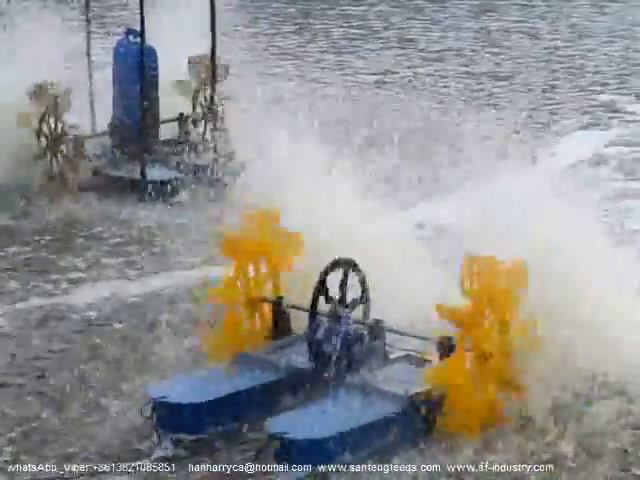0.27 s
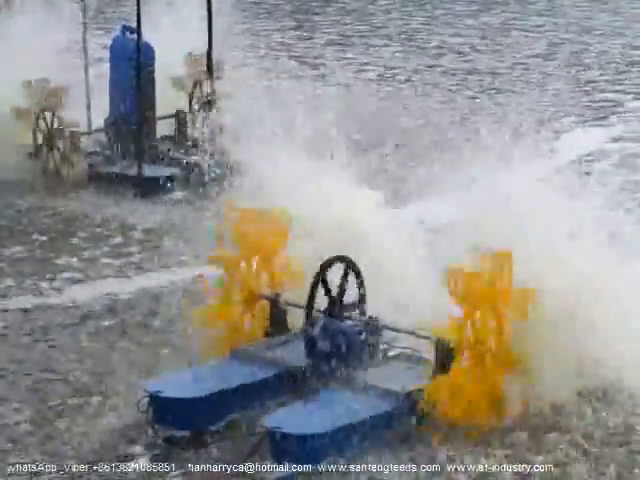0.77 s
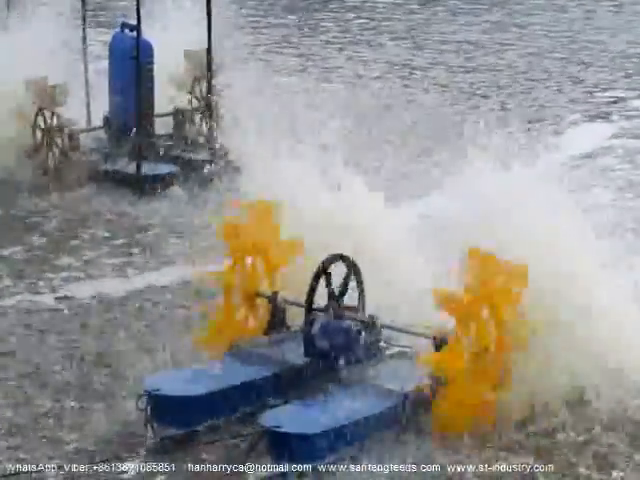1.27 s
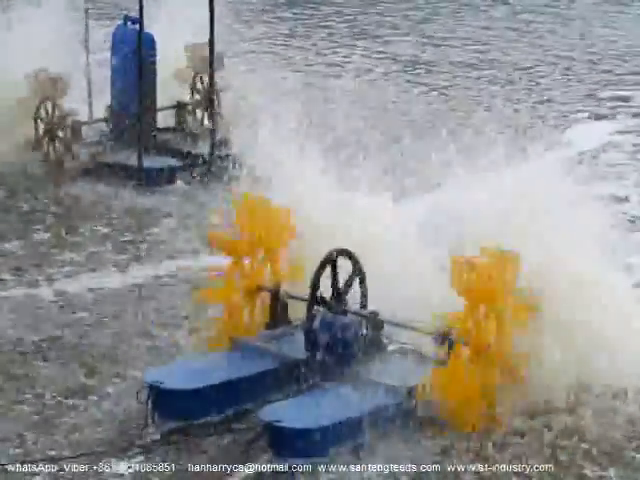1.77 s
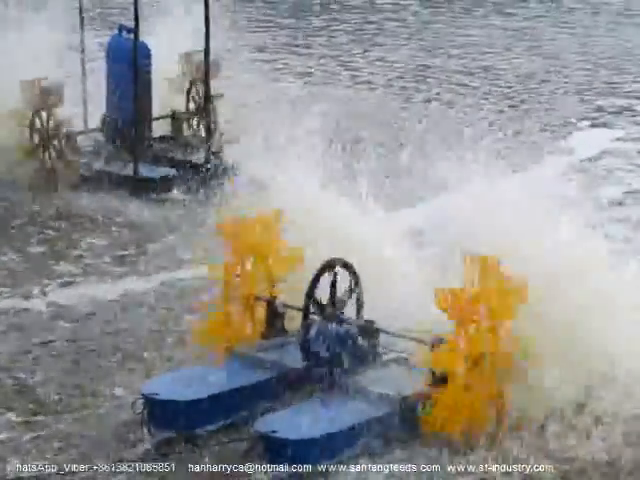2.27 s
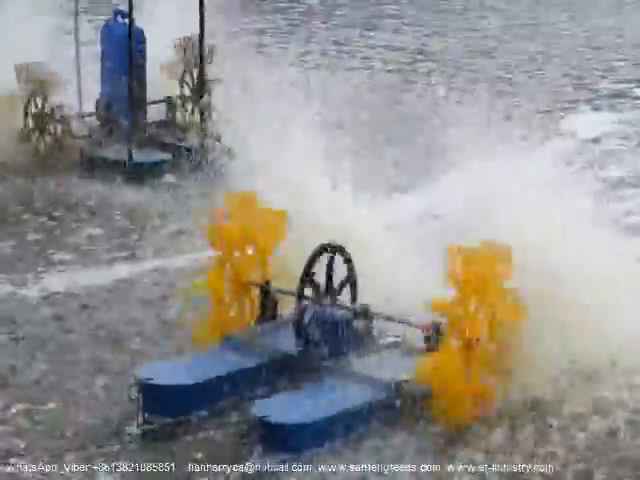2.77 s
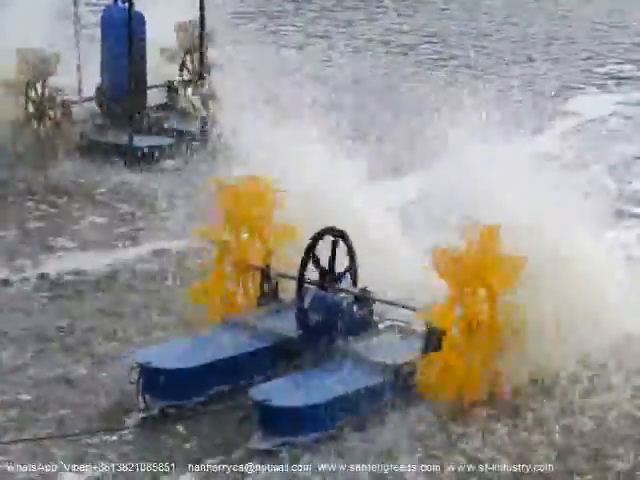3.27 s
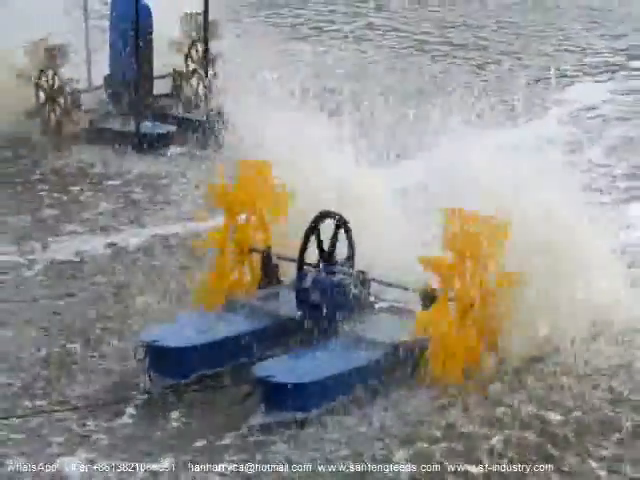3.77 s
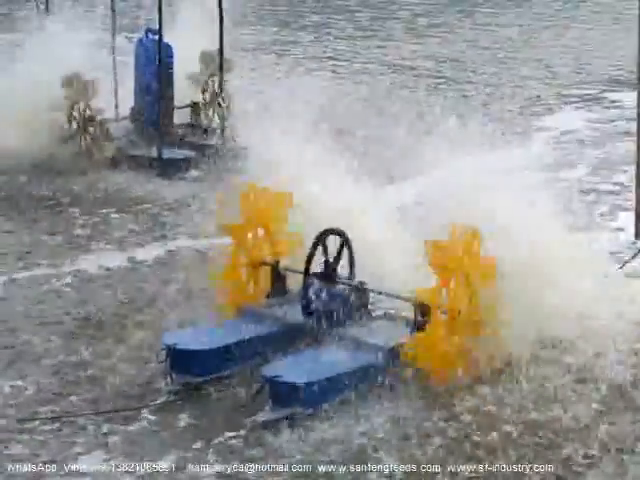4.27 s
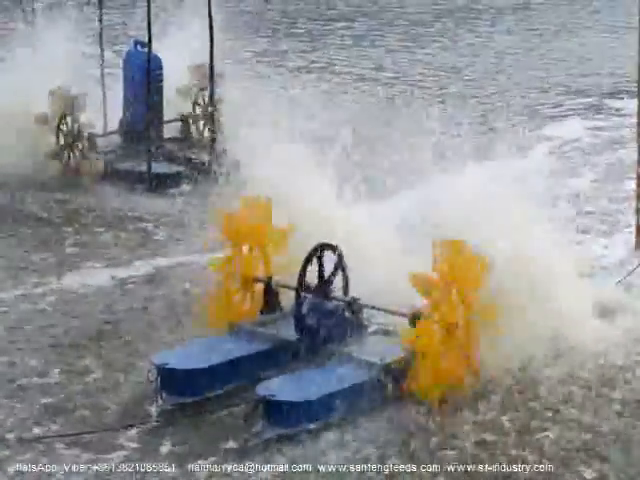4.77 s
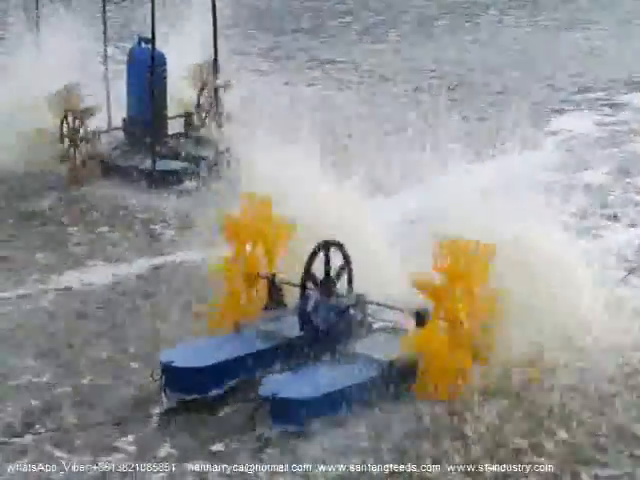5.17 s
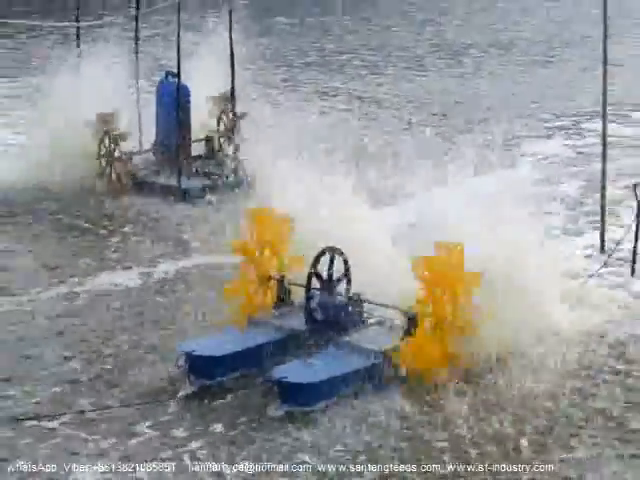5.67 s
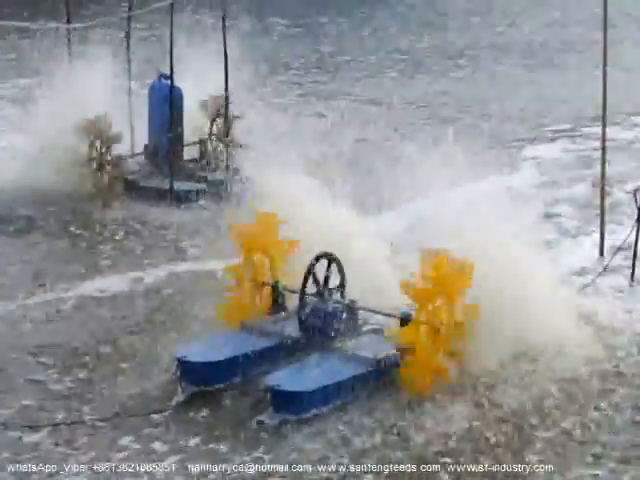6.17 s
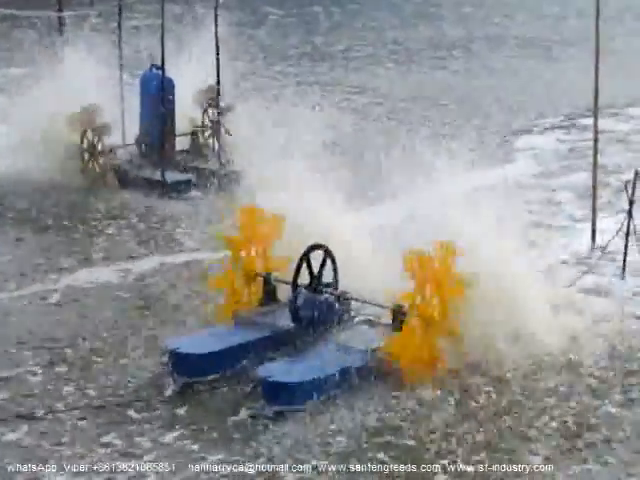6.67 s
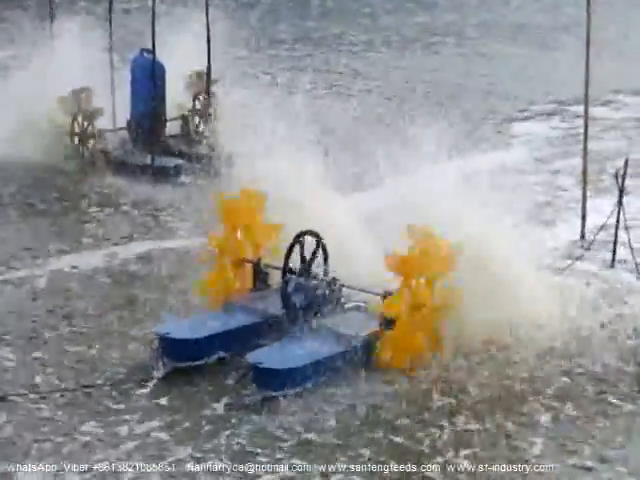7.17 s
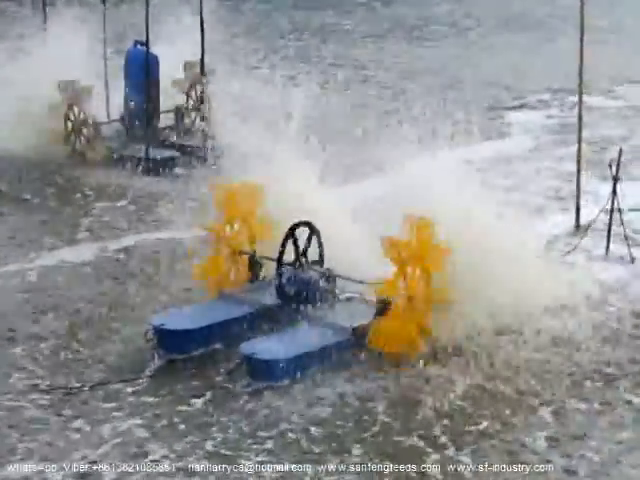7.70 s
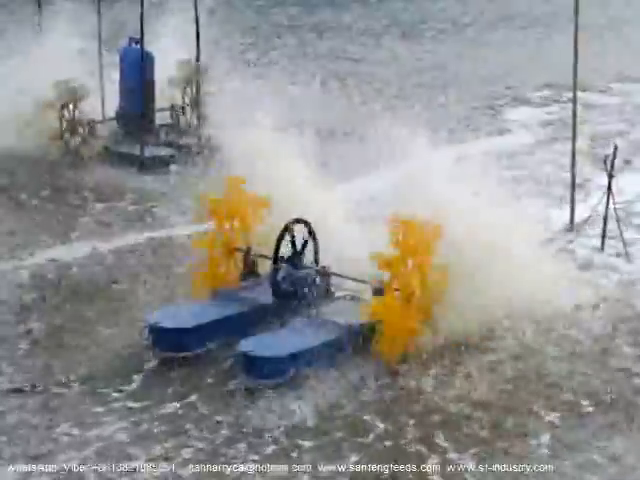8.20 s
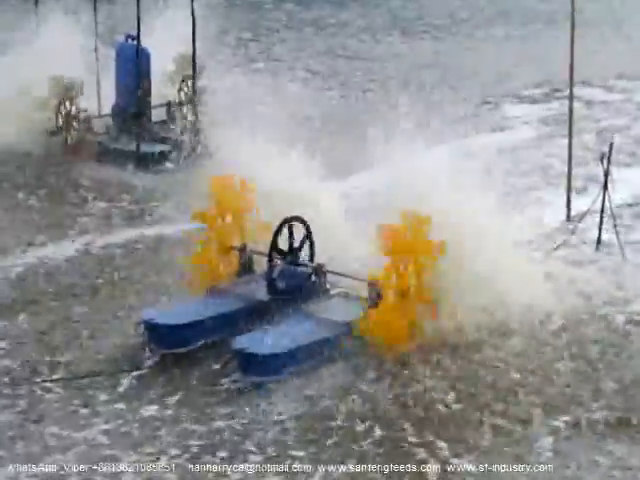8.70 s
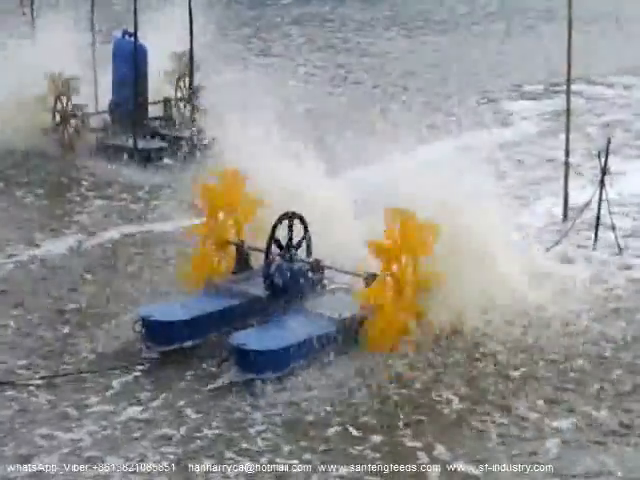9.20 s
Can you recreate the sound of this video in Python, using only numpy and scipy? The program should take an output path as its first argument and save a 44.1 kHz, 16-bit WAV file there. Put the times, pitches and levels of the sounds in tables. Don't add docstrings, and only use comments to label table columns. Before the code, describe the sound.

Outdoors beside a fish pond, paddle wheels throw water in a continuous hissing, bubbling wash with a low, steady motor hum beneath. Wind gusts rumble and thump against a handheld stereo microphone, strongest on the right, often covering the water in the first five seconds. The splashing dips around the middle, then comes forward, fuller and wider, as the wind eases toward the end.

```python
import sys
import numpy as np
from scipy import signal
from scipy.fft import rfft, irfft
from scipy.io import wavfile
from scipy.ndimage import uniform_filter1d

SR = 44100
rng = np.random.default_rng(int(sys.argv[2]) if len(sys.argv) > 2 else 0)


def volts(x):
    e = np.asarray(x, float) / 20
    return 10 ** e


def generate_wav(signal):
    frames = np.transpose(np.atleast_2d(signal))
    scaled = np.clip(frames, -1, 1) * 32767
    pcm = np.round(scaled).astype(np.int16)
    wavfile.write(sys.argv[1], SR, pcm)


N = 416304

# t/s, camera gain as spray level/dB, fullness of the churn/dB
POND_LEVEL = [(0.0, -44, 1), (0.8, -41, 2.5), (1.4, -36.5, 1.5), (2.05, -35.5, 1.5), (2.6, -43, 1.4),
              (3.0, -38.5, 1.5), (3.45, -44.5, 1.2), (3.95, -45, 1.5), (4.6, -52, 1.5), (5.05, -43.5, 3.5),
              (5.55, -50.5, 0), (6.4, -37.5, 2), (7.0, -36.5, 4), (7.4, -37.5, 6), (7.75, -40.5, 5),
              (8.2, -37, 8.5), (8.85, -33.5, 6.5), (9.44, -35, 5.5)]
# f/Hz, density/dB
SPRAY_SPECTRUM = [(40, 1.5), (100, 3.5), (200, 6), (400, 1.5), (570, 3), (850, 2.5), (1300, -4),
                  (2500, -8.5), (3300, -12.5), (4400, -13.5), (8300, -21), (10000, -20), (12600, -15.5),
                  (14200, -20)]
# peak
# t/s, length/s, level change of the wash/dB
PADDLE_THROWS = [(0.555, 0.11, -0.5), (1.35, .15, 0), (2.074, 0.11, 0), (2.925, 0.11, 1),
                 (3.648, 0.24, -0.5), (4.25, 0.13, 2), (5.114, 0.069, 1.5), (5.748, .1, 1.5),
                 (6.3, 0.16, 1), (7.004, 0.093, 0.5), (7.3, .12, 1.5), (7.91, 0.13, 1.5), (8.5, .15, 0.5),
                 (8.996, .1, -0.5)]
# t/s, peak level/dB, f/Hz,
# left minus right/dB
NEAR_TICKS = [(1.517, -15, 620, 18), (1.570, -11, 10200, 17), (2.924, -16, 1700, -1),
              (2.997, -19, 2200, -1), (3.571, -16, 1900, -1), (8.669, -27, 4800, -.5), (.658, -13, 371, 9),
              (4.254, -13, 350, -18), (4.262, -31, 3500, -16), (4.643, -21, 418, 15),
              (5.119, -11, 332, 5.5), (6.33, -13, 563, -4), (7.294, -14, 371, -8.5)]
# multiple of the shaft rate, level over the spray/dB
SHAFT_ORDERS = [(2, 12), (4, 8), (6, 1), (8, -5.5), (12, -11.5)]
# f/Hz, width/Hz, level over the spray/dB
HOUSING = [
    (60.6, 4.7, 3.5),
    (324.6, 67, -2.5),
    (545, 54, -7),
]
# t/s, lowest order level/dB, higher orders level/dB
OVER_WATER = [(0.0, 2, 0.5), (0.45, 0, 0), (0.95, -1, -0.5), (1.25, 0, 2), (1.45, -0.5, -2), (2.3, 0.5, -1),
              (2.6, -0.5, -2), (3.2, 2, 1), (4.0, -2, -2), (4.4, 1, 1.5), (5.5, 0, 0), (6.35, 0, -1.5),
              (7.15, 1, 1), (7.6, 3.5, 0.5), (8.6, -1.5, -1), (9.44, -1, -2.5)]
HUM_STEADINESS = [0.45, 0.14, -0.076]
HUM_USUAL_GAIN = [-40.5, -42.5, -38]
# peak t/s, length/s, buffet level/dB, rush above it/dB
GUSTS_LEFT = [(.06, 0.11, -20, -1), (.32, .12, -20, -13), (.63, 0.32, -18.5, -5.5), (1.2, 0.14, -20, -0.5),
              (1.49, 0.2, -17, -1.5), (1.8, .1, -20, -7), (2.22, 0.46, -22.5, -14), (2.6, 0.11, -28.5, -2),
              (3.0, 0.24, -18, -6), (3.38, 0.32, -24.5, -2.5), (3.8, 0.087, -29, -12),
              (4.33, .18, -23, -17), (4.63, 0.51, -24, -8.5), (5.05, 0.17, -20.5, -3),
              (5.2, 0.097, -19, -11), (6.6, .1, -21.5, -20), (6.9, 0.12, -28, 1), (7.16, .3, -24, -20),
              (7.72, .25, -23, -21), (8.05, .18, -25.5, -17), (8.9, .2, -27, -0.5), (9.15, 0.22, -26, -3)]
# peak t/s, length/s, buffet level/dB, rush above it/dB
GUSTS_RIGHT = [(0.108, 0.11, -15, -20), (0.377, 0.14, -15, -13), (0.59, 0.065, -16, -13),
               (.85, 0.11, -23, -2.5), (1.12, .13, -18, -20), (1.33, 0.18, -21, -10), (1.536, .2, -14, -13),
               (2.15, 0.24, -15, -10), (2.346, .2, -13, -10.5), (2.593, 0.079, -24, -24),
               (2.91, .1, -15.5, -14), (3.118, 0.088, -14, -7.5), (3.357, 0.27, -13.5, -15.5),
               (3.876, 0.14, -19, -7), (4.213, 0.11, -17, -4.5), (4.394, 0.1, -11.5, -11.5),
               (5.04, 0.18, -16.5, -13), (5.333, 0.23, -15, -10.5), (5.824, .13, -16.5, -9.5),
               (6.036, 0.078, -19.5, -11), (6.297, 0.046, -17.5, -6.5), (6.6, 0.064, -14.5, -17),
               (6.99, .17, -15, -16), (7.24, .2, -18, -9), (7.642, 0.22, -17, -25),
               (8.007, 0.092, -19.5, -23), (8.222, 0.16, -22.5, -4), (8.7, 0.43, -32, -2),
               (8.916, .1, -18.5, -12), (9.177, 0.29, -24, 0)]
# t/s, left port level/dB, right port level/dB
LIGHT_BREEZE = [(0.0, -27, -21), (1.0, -32, -21), (2.6, -25, -21.5), (3.9, -33, -21.5), (4.8, -34, -21),
                (5.6, -37, -31), (6.8, -34, -19.5), (8.4, -33, -28), (9.44, -27, -28)]
BREEZE_RUSH = [-14, -18]
# f/Hz, density/dB
BUFFET_SPECTRUM = [(15, 1.5), (28, -1), (60, 1.5), (100, -2), (160, -11.5), (300, -37.5), (600, -69),
                   (1500, -120)]
# f/Hz, density/dB
RUSH_SPECTRUM = [(30, -40), (60, 2.5), (130, 8.5), (200, 6), (320, -4.5), (500, -12), (800, -26.5),
                 (1500, -49), (3000, -120)]
# t/s, f/Hz, left peak level/dB, right peak level/dB
EDDY_THUMPS = [(0.14, 41, -5, -11), (0.257, 41, -20, -7), (0.594, 77, -5, -24), (0.637, 106, -5, -23),
               (1.116, 124, -11, -21), (1.255, 171, -3.5, -43), (1.533, 106, -2, -24),
               (1.687, 77, -24, -6.5), (1.736, 106, -33, -0.5), (2.025, 66, -30, -6), (2.109, 48, -26, -4),
               (2.234, 56, -16, 2), (2.301, 91, -27, -1), (2.356, 66, -21, -7), (2.396, 106, -20, -1),
               (2.444, 66, -15, -2.5), (2.925, 66, -12, -5.5), (2.987, 56, -26, -1), (3.054, 77, -11, -22),
               (3.117, 35, -13, -28), (3.154, 42, -14, -0.5), (4.275, 36.4, -15, -1.5),
               (4.393, 48, -22, -4), (5.034, 35, -12, -5.5), (5.157, 35, -11, -15), (6.913, 56, -27, -10),
               (7.173, 56, -23, -8), (7.328, 91, -26, -5.5), (7.398, 91, -19, -3.5), (7.524, 89, -32, -3)]
# f/Hz, left minus right/dB
BODY_LEAN = [(60, -7), (110, -7.5), (200, -10.5), (370, -8.5), (670, -5.5), (1230, -2.5), (2250, -0.5),
             (4110, 1), (7520, -1), (13800, -0.5)]
# f/Hz, lead/rad
LEFT_LEAD = [(0, 0.089), (860, 0.61), (3190, -0.0), (8180, 0), (9820, 0.0), (12000, 0.65), (13000, 0.7),
             (13300, 0.8), (14000, 0.4)]
# f/Hz, level/dB
PORTS_APART = [(100, -23), (300, -3), (700, -24), (1400, -11), (2500, -17.5), (3300, -24), (4200, -17.5),
               (6000, -20), (8500, -14.5), (11000, -10.5), (14000, -13)]
# t/s, spread/dB
CAMERA_SWING = [(0.0, -3), (3.0, -3), (4.3, 0), (6.0, -1), (8.05, -0.5), (8.25, 8), (8.85, 10), (9.05, 1),
                (9.44, 4)]


def churn(fullness_db):
    water = [rng.standard_normal(N) + 0.22 * bubbles(), rng.standard_normal(N)]
    hz, t, z = signal.stft(water, SR, nperseg=512, noverlap=384)
    patches = uniform_filter1d(rng.standard_normal(z.shape[1:]), size=8, axis=0)
    patches = evened(uniform_filter1d(patches, size=12, axis=1))
    surge_db = 0.6 * drift(40.0)[np.minimum(t * SR, N - 1).astype(int)]
    low_share = 1 / (1 + (hz / 2400) ** 2)[:, None]
    fuller_db = low_share * np.interp(t, np.arange(N) / SR, fullness_db - 7.5)
    z = z * volts(1.02 * patches + surge_db + fuller_db)
    alike, apart = signal.istft(z, SR, nperseg=512, noverlap=384)[1][:, :N]
    return volts(8.5) * coloured(alike, SPRAY_SPECTRUM), volts(10.0) * coloured(apart, SPRAY_SPECTRUM)


def bubbles():
    per_s, cycles, size_db, pitches = 5000, 1.5, 5.5, 18
    out = np.zeros(N)
    born, kind = rng.random((2, N))
    size = volts(size_db * np.minimum(rng.exponential(1, N), 5))
    train = (born < per_s / SR) * size
    band = (kind * pitches).astype(int)
    for k, hz in enumerate(np.linspace(400, 14200, num=pitches)):
        turns = np.arange(int(3 * cycles * SR / hz)) * hz / SR
        ring = np.sin(2 * np.pi * turns * (1 + 0.0029 * turns))
        grain = ring * turns * np.exp(-3 * turns / cycles)
        out += evened(signal.oaconvolve(train * (band == k), grain)[:N])
    return evened(out)


def throws():
    t = np.arange(N) / SR
    return sum(db * np.exp(-np.log(2) * (2 * (t - s) / length) ** 2) for s, length, db in PADDLE_THROWS)


def ticks():
    out, t = np.zeros((2, N)), np.arange(600) / SR
    for s, db, hz, pan_db in NEAR_TICKS:
        decay = volts(db - 4.4 * t * hz)
        tick = decay * np.tanh(t * hz / 2) * np.sin(2 * np.pi * hz * t)
        part = out[:, round(s * SR):][:, :len(t)]
        part += volts([[pan_db / 2], [-pan_db / 2]]) * tick[:part.shape[1]]
    return out


def motor(gain_db):
    shaft_hz = 64.27
    turns = np.cumsum(shaft_hz * (1 + 0.00084 * drift(0.6))) / SR
    low_db, high_db = columns(OVER_WATER, np.arange(N) / SR)
    carry_db = [air_db + share * (usual_db - gain_db)
                for air_db, share, usual_db in zip((low_db, high_db, high_db), HUM_STEADINESS, HUM_USUAL_GAIN)]
    out = np.zeros(N)
    for i, (k, db) in enumerate(SHAFT_ORDERS):
        blur = 0.0023 * k ** 2 * drift(6.0)
        phase = k * turns + rng.random() + blur
        level = volts(db + carry_db[min(i, 2)] + 0.6 * k * drift(9.8))
        out += level * np.sqrt(2) * np.sin(2 * np.pi * phase)
    hz = np.fft.rfftfreq(N, 1 / SR)
    for centre_hz, width_hz, db in HOUSING:
        shaken = rfft(rng.standard_normal(N)) / (1 + (2 * (hz - centre_hz) / width_hz) ** 2)
        out += volts(db) * evened(irfft(shaken, N))
    return out


def wind():
    t = np.arange(N) / SR
    left_db, right_db = columns(LIGHT_BREEZE, t)
    left = blowing(GUSTS_LEFT, left_db, BREEZE_RUSH[0])
    right = blowing(GUSTS_RIGHT, right_db, BREEZE_RUSH[1])
    buffet, rush = np.stack([left, right], axis=1)
    rush = volts(1.5) * rush * eddies(RUSH_SPECTRUM, 5.8, 29.0, left_pitch=1.34)
    buffet = buffet * eddies(BUFFET_SPECTRUM, 3.8, 17.6)
    ports = volts([[-1.5], [0.5]]) * (buffet + rush)
    out = ports + np.array([[0.22], [0.1]]) * ports[::-1]
    for s, hz, *peak_db in EDDY_THUMPS:
        near = slice(max(round((s - 0.04) * SR), 0), round((s + 0.04) * SR))
        u = 2 * np.pi * hz * (t[near] - s)
        out[:, near] *= 1 - 0.25 * np.exp(-u ** 2 / 8)
        out[:, near] -= volts(peak_db)[:, None] * 1.37 * np.tanh(1.4 * u) * np.exp(-u ** 2 / 3.5)
    return out


def blowing(gusts, breeze_db, rush_db):
    edge = 2.6
    t = np.arange(0, N, 64) / SR
    power = volts(2 * breeze_db[::64]) * volts([[0], [2 * rush_db]])
    for s, length, db, above_db in gusts:
        swell = np.exp(-np.log(2) * abs(2 * (t - s) / length) ** edge)
        power = power + swell * volts([[2 * db], [2 * (db + above_db)]])
    return [np.interp(np.arange(N) / SR, t, np.sqrt(p)) for p in power]


def eddies(spectrum, lumps_db, rate_hz, left_pitch=1):
    x = [coloured(rng.standard_normal(N), np.multiply(spectrum, [pitch, 1])) for pitch in (left_pitch, 1)]
    x = x * volts([lumps_db * drift(rate_hz), lumps_db * drift(rate_hz)])
    return x / np.sqrt(uniform_filter1d(x ** 2, size=5000, axis=1) + 1e-3)


def body_echo(x):
    delay_s, share = 0.001818, -0.16
    hz = np.fft.rfftfreq(N, 1 / SR)
    echo = share * np.exp(-2j * np.pi * hz * delay_s) / (1 + (2300 / (hz + 1)) ** 4)
    return irfft(rfft(x) * (1 + echo), N)


def to_ports(alike, apart, spread_db):
    hz, t, z = signal.stft([alike, apart], SR, nperseg=1024, noverlap=768)
    high_share = (hz ** 4 / (hz ** 4 + 4500 ** 4))[:, None]
    spread = high_share * np.interp(t, np.arange(N) / SR, spread_db)
    side = volts(read(PORTS_APART, hz)[:, None] + spread) * z[1]
    half = (volts(read(BODY_LEAN, hz) / 2) * np.exp(0.5j * read(LEFT_LEAD, hz)))[:, None]
    pair = [(z[0] + side) * half, (z[0] - side) / half]
    return signal.istft(np.array(pair), SR, nperseg=1024, noverlap=768)[1][:, :N]


def evened(x):
    return x / np.sqrt(np.mean(abs(x) ** 2) + 1e-20)


def read(points, hz):
    f, value = np.transpose(points)
    return np.interp(np.log(hz + 1), np.log(f + 1), value)


def columns(table, t):
    s, *rest = np.transpose(table)
    return [np.interp(t, s, c) for c in rest]


def drift(rate_hz):
    steps = N // 64 + 2
    hz = np.fft.rfftfreq(steps, 64 / SR)
    slow = irfft(rfft(rng.standard_normal(steps)) / (1 + (hz / rate_hz) ** 2), steps)
    return np.interp(np.arange(N) / 64, np.arange(steps), evened(slow))


def coloured(x, spectrum):
    return evened(irfft(rfft(x) * volts(read(spectrum, np.fft.rfftfreq(N, 1 / SR))), N))


def scene():
    t = np.arange(N) / SR
    gain_db, fullness_db = columns(POND_LEVEL, t)
    spread_db, = columns(CAMERA_SWING, t)
    alike, apart = volts(throws()) * churn(fullness_db)
    pond = to_ports(body_echo(alike) + motor(gain_db), apart, spread_db)
    return volts(gain_db) * pond + wind() + ticks()


def low_pass(x):
    return signal.sosfilt(signal.butter(12, 14360, fs=SR, output="sos"), x)


def record(dry):
    edge_hz = 14190
    held = 1.08 * np.tanh(dry / 1.161)
    lowpass = signal.firwin(767, edge_hz, window=("kaiser", 9), fs=SR)
    held = signal.oaconvolve(held, lowpass[None], "same")
    return low_pass(held)


dry = scene()
out = record(dry)
generate_wav(out)
```